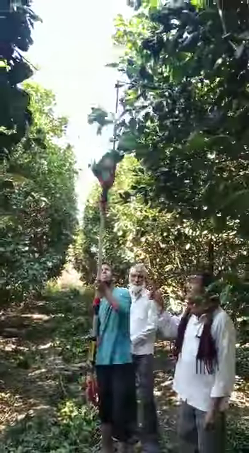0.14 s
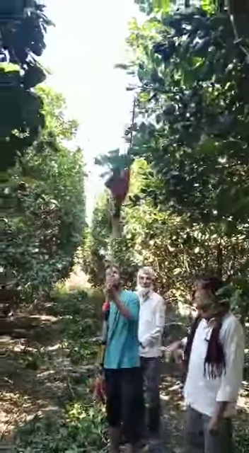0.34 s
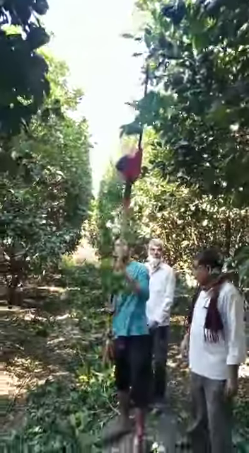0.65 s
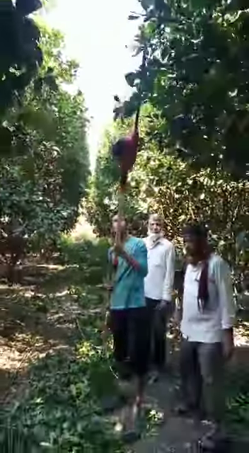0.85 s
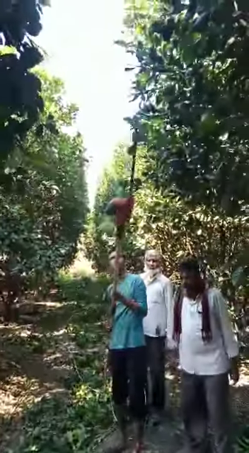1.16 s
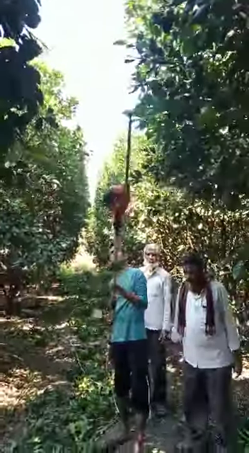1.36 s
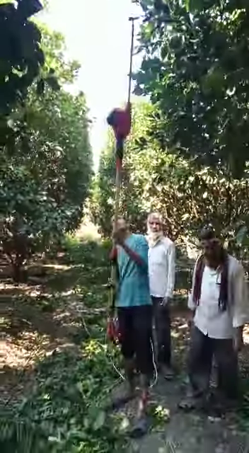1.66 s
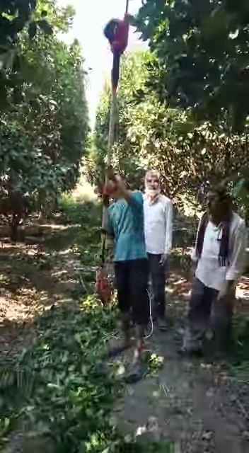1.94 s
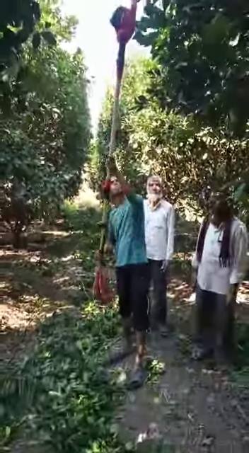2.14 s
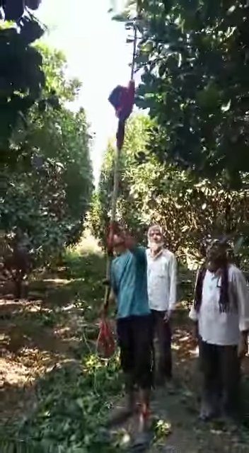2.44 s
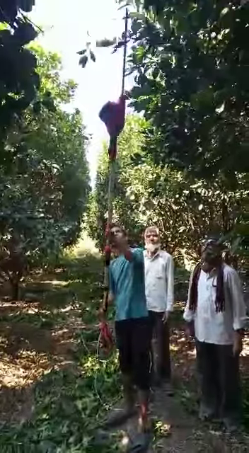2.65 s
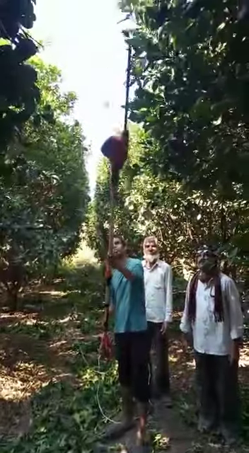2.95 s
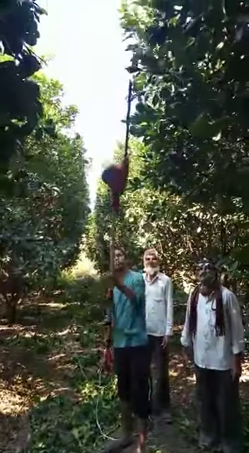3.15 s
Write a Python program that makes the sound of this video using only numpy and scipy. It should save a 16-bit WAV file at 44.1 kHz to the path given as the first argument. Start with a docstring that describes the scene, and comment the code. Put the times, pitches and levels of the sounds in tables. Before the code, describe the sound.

An electric pole hedge trimmer runs steadily a few steps away outdoors, its steel blades making a high, pulsing rasp over a thin motor whine. Twigs snip briefly early on and again near the end, slightly slowing the motor.

```python
"""An electric pole hedge trimmer runs among orchard trees, a few steps away.
Its steel blades rub to and fro, making a rasp that swells with each sweep and rings the bar.
The tone of the rasp turns as the pole is lifted. The motor hums and whines, rattles its housing
and sags when twigs are cut with a short crunch. Faint outdoor air lies underneath."""
import sys
import numpy as np
from scipy import signal
from scipy.fft import rfft, irfft
from scipy.io import wavfile
from scipy.ndimage import map_coordinates

SR = 44100
rng = np.random.default_rng(int(sys.argv[2]) if len(sys.argv) > 2 else 0)


def materialize(psi):
    """Save the field psi as 16-bit PCM at rate SR to the path in sys.argv[1].

    A 1-D psi becomes a single channel; in a 2-D psi each row is a channel.
    """
    bounded = np.clip(np.atleast_2d(psi).T, -1, 1)
    quanta = np.round(bounded * 32767).astype(np.int16)
    wavfile.write(sys.argv[1], SR, quanta)


N = 145530
T = np.arange(N) / SR


def from_db(db):
    """Turn decibels into a gain."""
    return 10 ** (np.asarray(db) / 20)


def rms_one(x):
    """Scale a sound so its average strength (rms) is 1."""
    return x / np.sqrt(np.mean(x ** 2) + 1e-20)


def in_time(rows):
    """Join (seconds, value) rows with straight lines."""
    return np.interp(T, *np.transpose(rows))


def drift(hz):
    """A smooth random wobble, about 1 in size; more hz makes it quicker."""
    step, warm_up = 40, 2000  # samples per point, points skipped
    pole = np.exp(-2 * np.pi * hz * step / SR)
    noise = rng.standard_normal(N // step + warm_up + 2)
    slow = signal.lfilter([1], [1, -2 * pole, pole * pole], noise)[warm_up:]
    return np.interp(np.arange(N) / step, np.arange(len(slow)), rms_one(slow))


def with_tone(x, tone):
    """Shape a sound by (Hz, dB) rows, fading 80 dB per octave past their ends."""
    hz, db = np.transpose(tone)
    octave = np.log2(np.maximum(np.fft.rfftfreq(N, 1 / SR), 1))
    points = np.log2(hz)
    beyond = np.abs(octave - np.clip(octave, points[0], points[-1]))
    gain = from_db(np.interp(octave, points, db) - 80 * beyond)
    return rms_one(irfft(rfft(x) * gain, N))


def blend_tones(x, low, high, lift):
    """Mix the tones heard with the pole low and high."""
    return rms_one((1 - lift) * with_tone(x, low) + lift * with_tone(x, high))


def friction(swing_db=0, ticks_per_s=3500, tick_share=0.26):
    """Sliding steel: many tiny, uneven ticks over smooth rubbing."""
    sizes = from_db(np.minimum(rng.exponential(1, N), 4)) * rng.choice([-1, 1], N)
    ticks = rms_one(sizes * (rng.random(N) < ticks_per_s / SR))
    rubbing = rng.standard_normal(N)
    return from_db(swing_db) * (np.sqrt(tick_share) * ticks + np.sqrt(1 - tick_share) * rubbing)


def resonance(x, hz, width_hz):
    """Make a sound ring around one pitch."""
    pole = np.exp(-np.pi * width_hz / SR)
    band = [1, 0, -1, 1, -2 * pole * np.cos(2 * np.pi * hz / SR), pole * pole]
    return rms_one(signal.sosfilt([band, band], x))


def ringing(rings, swing_db, lift):
    """Friction keeps a part ringing; each ring's level wanders and shifts with the pole."""
    sound = np.zeros(N)
    for hz, width_hz, low_db, high_db in rings:
        level_db = low_db + (high_db - low_db) * lift + 3.26 * drift(hz=2.3)
        sound += from_db(level_db) * resonance(friction(swing_db), hz, width_hz)
    return sound


# The tone of the air. Each row: pitch in Hz, relative level in dB.
AIR_TONE = [(20, 1), (50, 2), (80, -11), (150, -1), (600, -16), (3000, -32)]

def outdoor_air():
    """Still air: a very faint, low rush that wavers."""
    return from_db(-78.5 + 4.9 * drift(hz=7.7)) * with_tone(rng.standard_normal(N), AIR_TONE)


# Echoes off leaves and ground. Each row: extra path in metres, level in dB against the direct sound.
ECHOES = [(0.549, -31), (0.952, -26), (1.599, -23), (2.5, -16)]

def among_trees(x, sway_m=0.0075, sound_m_per_s=343):
    """Add faint, quick echoes whose paths shift as the pole sways."""
    echoes = np.zeros(N)
    for metres, db in ECHOES:
        delay_s = (metres + sway_m * drift(hz=1.4)) / sound_m_per_s
        echoes += from_db(db) * map_coordinates(x, [(T - delay_s) * SR], order=3, mode="wrap")
    return rms_one(x + echoes)


def crunches(rows, tone):
    """Short swells of crackle."""
    swells = sum(from_db(db) * np.exp(-((T - peak_s) / half_s) ** 2) for peak_s, db, half_s in rows)
    return swells * with_tone(friction(), tone)


# Twigs being cut. Each row: loudest moment in seconds, level in dB, half-length in seconds.
SNIPS = [(.599, -33, 0.032), (.635, -34, 0.026), (.899, -29, 0.0042), (2.942, -26, .009)]
# The tones of a snip and a knock. Each row: pitch in Hz, relative level in dB.
SNIP_TONE = [(40, -39), (120, -18.5), (250, 5.5), (1000, 8), (3000, 5), (7000, 13.5), (12000, 5),
             (15000, -12)]
KNOCK_TONE = [(30, -8), (90, 1), (180, 8), (400, -6), (900, -24)]

def twigs():
    """The blades snip twigs; the thickest sends a knock down the pole."""
    snips = crunches(SNIPS, SNIP_TONE)
    knock = crunches([(2.943, -52.5, 0.008)], KNOCK_TONE)
    return snips + knock


# The rattle's tone, pole low and pole high. Each row: pitch in Hz, relative level in dB.
RATTLE_LOW = [(115, -58), (150, -24.5), (230, -10.5), (310, -8), (395, -2), (470, -8.5), (550, 0.5),
              (630, -6.5), (760, 1), (950, -4), (1090, -3), (1300, 4), (1700, 0.5), (2200, 0)]
RATTLE_HIGH = [(115, -28), (210, -16.5), (310, -9), (390, -2), (450, -14), (520, -6), (585, -15), (690, 0),
               (1000, -2), (1110, -9), (1400, -0.5), (1750, -3), (2200, -2.5)]
# The housing's rings. Each row: pitch in Hz, width in Hz, dB against the rattle with pole low, then high.
HOUSING_RINGS = [(702, 60, -20, -15), (895, 78, -15.5, -5), (1383, 110, -13.5, -7.5), (1566, 76, -34, -7)]
# How loud the housing is. Each row: time in seconds, relative level in dB.
HOUSING_LEVEL = [(0.0, -40), (0.69, -42), (0.78, -43), (1.1, -40), (1.36, -42), (2.64, -40), (2.82, -44),
                 (2.85, -40), (3.27, -42), (3.3, -40)]

def housing(swing_db, lift):
    """The crank rattles the motor housing and makes it ring."""
    gentler_db = 0.8 * swing_db
    rattle = blend_tones(friction(gentler_db), RATTLE_LOW, RATTLE_HIGH, lift)
    rings = ringing(HOUSING_RINGS, gentler_db, lift)
    return from_db(in_time(HOUSING_LEVEL) - 0.77) * (rattle + rings)


# The notes in the hum. Each row: vibrations per motor turn, relative level in dB.
HUM_NOTES = [(1, -3), (2, -7), (3, -10), (12, 0.5)]
# How loud the hum and whine are. Each row: time in seconds, relative level in dB.
HUM_LEVEL = [(0, -45.5), (.28, -52.5), (.5, -49.5), (.65, -59), (.85, -56.5), (1.45, -52.5), (1.7, -51),
             (2.2, -51.5), (2.5, -46), (2.7, -48), (3.0, -50.5), (3.3, -52)]
WHINE_LEVEL = [(0, -34), (.2, -28.5), (.3, -35), (.42, -32), (.62, -34), (.83, -29), (1.1, -36),
               (1.55, -35.5), (1.95, -28.5), (2.15, -36), (2.35, -34), (2.7, -24.5), (2.9, -34), (3.3, -34)]

def motor(turns, swing_db, whine_per_turn=21):
    """The spinning motor makes a clean hum and a fluttering whine high above it."""
    angle = 2 * np.pi * turns
    hum = sum(from_db(db + 0.5 * drift(hz=5.2)) * np.sin(per_turn * angle) for per_turn, db in HUM_NOTES)
    whine_db = in_time(WHINE_LEVEL) + swing_db + 2.5 * drift(hz=25)
    whine = from_db(whine_db) * np.sin(whine_per_turn * angle)
    return np.sqrt(2) * (from_db(in_time(HUM_LEVEL)) * hum + whine)


def stroke_swing(turns, turns_per_stroke=14.75):
    """The rise and fall in dB as the blades sweep twice per stroke, once harder."""
    angle = 2 * np.pi * (turns / turns_per_stroke + 0.345)
    sweeps_db = 1.36 * np.cos(2 * angle) + 0.88 * np.cos(angle)
    flicker_db = 0.5 * drift(hz=45)
    drag_db = 0.76 * drift(hz=12.5)  # uneven friction
    return sweeps_db + flicker_db + drag_db


# The tones of the rasp (pole low, pole high) and sizzle. Each row: pitch in Hz, relative level in dB.
RASP_LOW = [(2000, -23.5), (2400, -16.5), (2700, -10.5), (3200, -8.5), (4850, -8.5), (5700, -2.5),
            (6400, 1), (7000, -2), (7800, -8.5), (9200, -9.5), (10500, -16), (11500, -16.5), (12500, -25),
            (13500, -20)]
RASP_HIGH = [(2000, -23), (2500, -11), (3000, -12), (3280, -15), (3600, -10), (4700, -10), (5400, -4),
             (6600, -2), (7400, 1), (8200, -4), (9100, -10.5), (9550, -20.5), (10200, -17.5), (11400, -21),
             (12500, -30), (13500, -21)]
SIZZLE_TONE = [(13000, -45), (14000, -10), (14500, -10.5), (15000, 7), (15600, 2), (16000, -2.5)]
# How loud the rasp and the bar's rings are together. Each row: time in seconds, relative level in dB.
BLADE_LEVEL = [(0, -21.5), (.22, -22), (.27, -23), (.45, -22), (.7, -23.5), (.9, -22), (1.1, -22),
               (1.25, -23), (1.55, -22.5), (1.62, -21.5), (1.95, -20.5), (2.1, -20.5), (2.4, -21),
               (2.68, -21), (2.8, -21.5), (2.92, -21), (3.1, -21.5), (3.3, -21.5)]
# The bar's strongest ring. Each row: time in seconds, relative level in dB.
MAIN_RING_LEVEL = [(0, -20), (.12, -4), (.3, -16), (.6, -12), (.75, -3), (1.1, -15), (1.45, -21), (1.6, -4),
                   (1.75, -21), (2.95, -16.5), (3.2, -9.5), (3.3, -7)]
# Its other rings. Each row: pitch in Hz, width in Hz, relative dB with pole low, then high.
BAR_RINGS = [(3092, 230, -24.5, -24.5), (5010, 71, -29, -25), (6590, 100, -28, -6), (8070, 100, -19.5, -19),
             (8490, 370, -26, -22.5), (9220, 140, -19, -40), (10010, 300, -14, -35.5),
             (10530, 160, -20, -43)]

def blades(swing_db, lift):
    """Steel rubs on steel: it rasps, sizzles thinly and rings the bar, pulsing with each sweep."""
    rubbing = among_trees(friction(swing_db))
    rasp = from_db(-0.67) * blend_tones(rubbing, RASP_LOW, RASP_HIGH, lift)
    sizzle = from_db(-31.5 - 1.5 * lift) * with_tone(rubbing, SIZZLE_TONE)
    main_ring = from_db(in_time(MAIN_RING_LEVEL)) * resonance(friction(swing_db), hz=6260, width_hz=120)
    other_rings = ringing(BAR_RINGS, swing_db, lift)
    return from_db(in_time(BLADE_LEVEL)) * (rasp + main_ring + other_rings) + sizzle


# The motor's speed, sagging at the cuts. Each row: time in seconds, turns per second.
MOTOR_SPEED = [(0.0, 340.5), (0.2, 342.6), (0.3, 340.0), (0.45, 342.4), (0.58, 340.5), (0.65, 325.7),
               (0.9, 336.2), (1.2, 335.2), (1.4, 340.5), (1.75, 343.6), (2.3, 346.9), (2.52, 346.2),
               (2.68, 335.7), (2.9, 341.4), (2.96, 332.4), (3.05, 332.9), (3.22, 338.1), (3.3, 338.1)]
# How far the pole is lifted. Each row: time in seconds, lift from 0 (low) to 1 (high).
POLE_LIFT = [(0, .2), (.6, 0.16), (.9, 0.28), (1.5, 0), (1.78, 0.68), (2.15, 0.73), (2.55, 0.66),
             (2.9, 0.7), (3.3, 0.12)]

def hedge_trimmer():
    """One motor drives it all, so rasp, rattle and whine pulse together."""
    speed = in_time(MOTOR_SPEED) * (1 + 0.00114 * drift(hz=56))
    turns = np.cumsum(speed) / SR
    swing_db = stroke_swing(turns)
    lift = in_time(POLE_LIFT)
    return blades(swing_db, lift) + housing(swing_db, lift) + motor(turns, swing_db)


def scene():
    """The trimmer, the twigs and the air, the same in both ears."""
    return np.tile(hedge_trimmer() + twigs() + outdoor_air(), (2, 1))


def record(dry, cutoff_hz=15800):
    """Cut away the very highest treble."""
    low_pass = signal.firwin(801, cutoff_hz, fs=SR, window="blackman")
    return signal.fftconvolve(dry, low_pass[None], "same", axes=1)


dry = scene()
out = record(dry)
materialize(out)
```